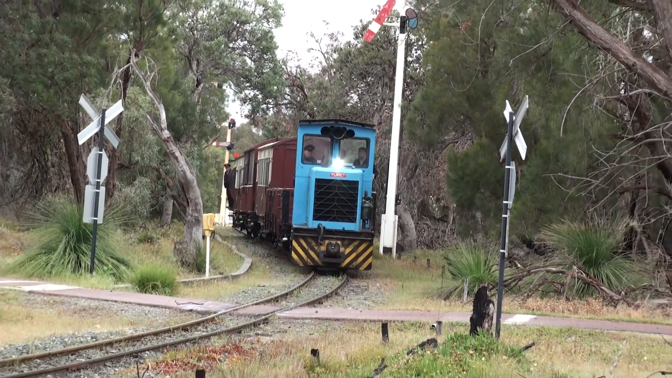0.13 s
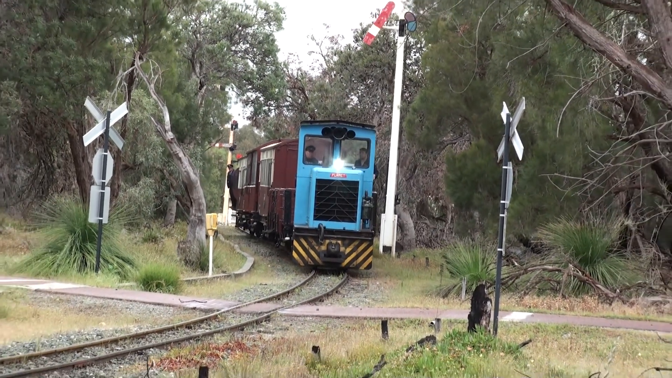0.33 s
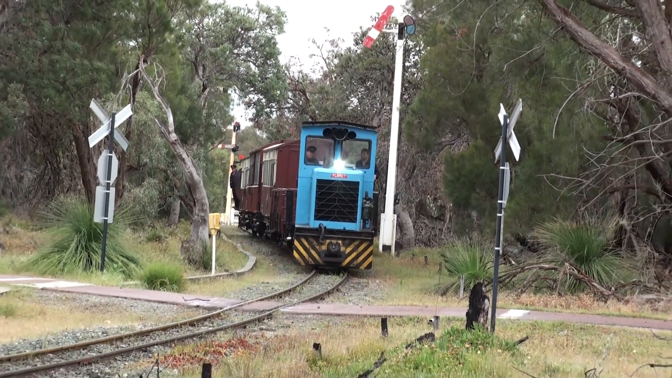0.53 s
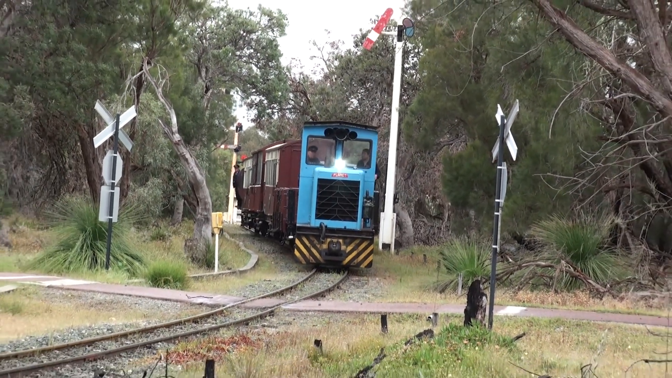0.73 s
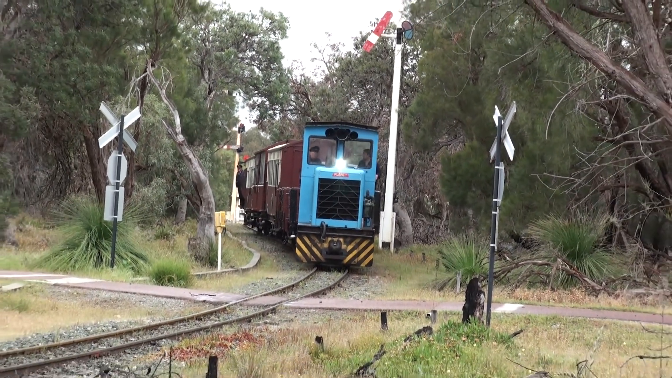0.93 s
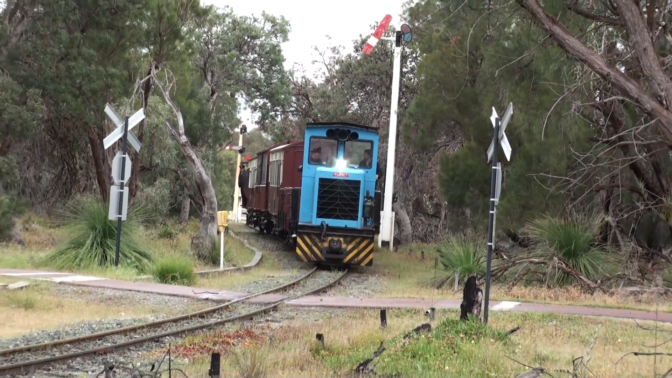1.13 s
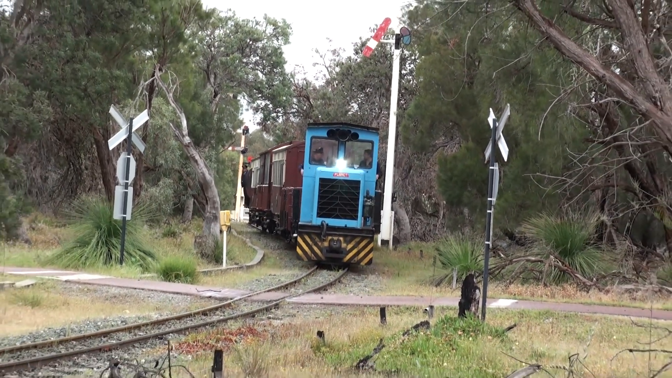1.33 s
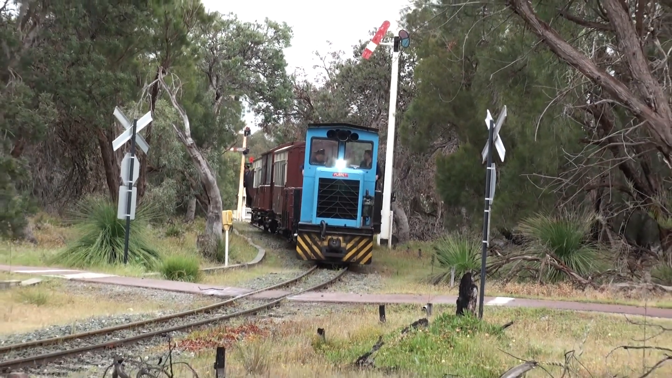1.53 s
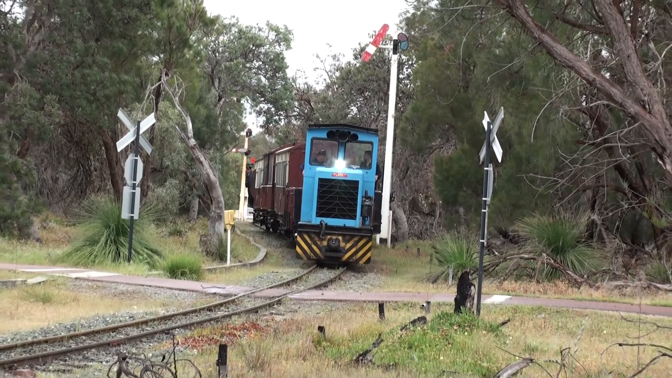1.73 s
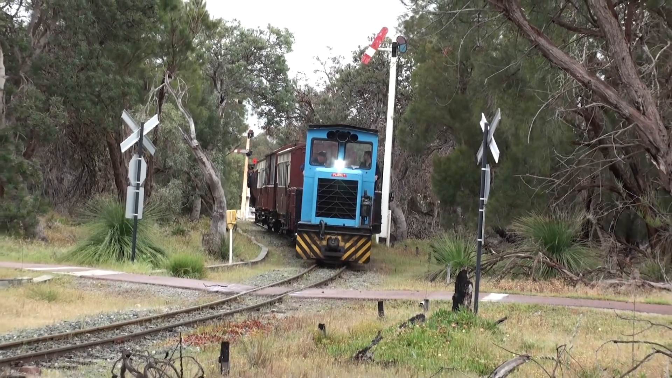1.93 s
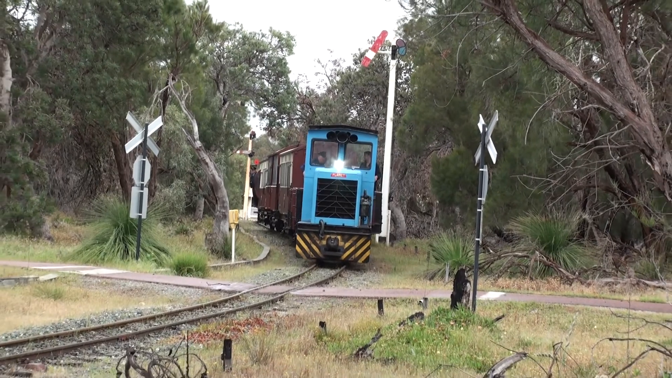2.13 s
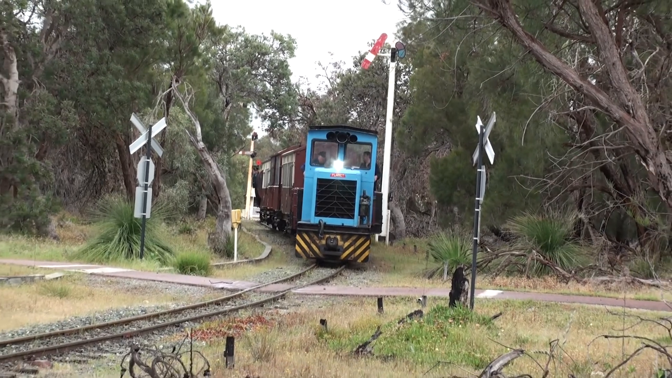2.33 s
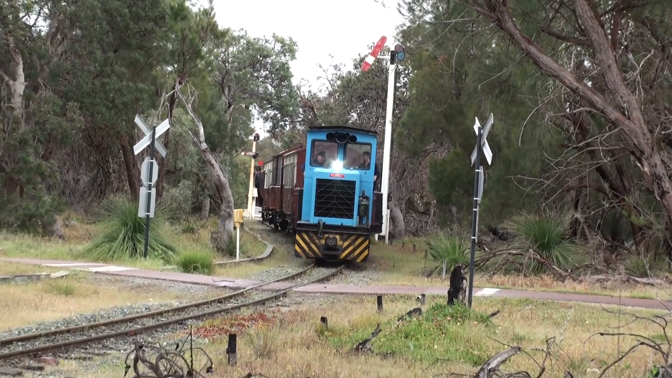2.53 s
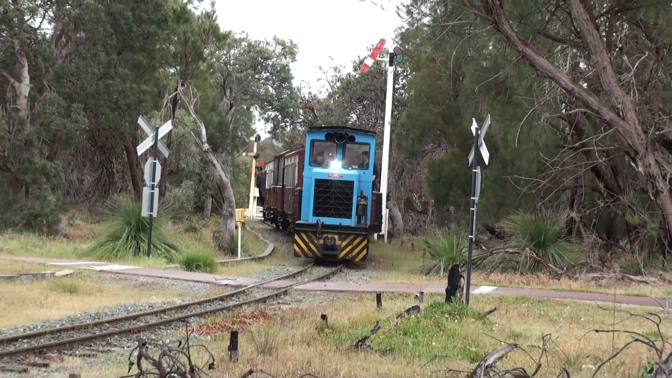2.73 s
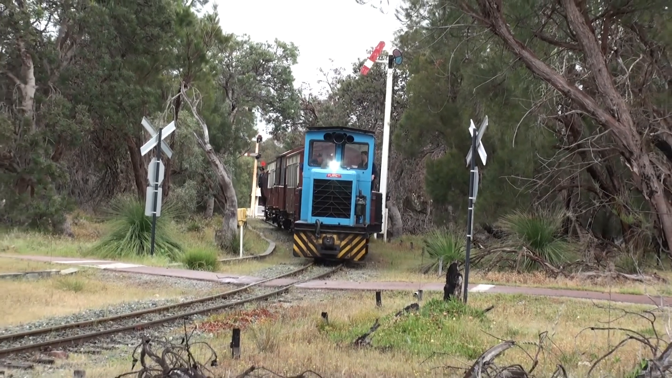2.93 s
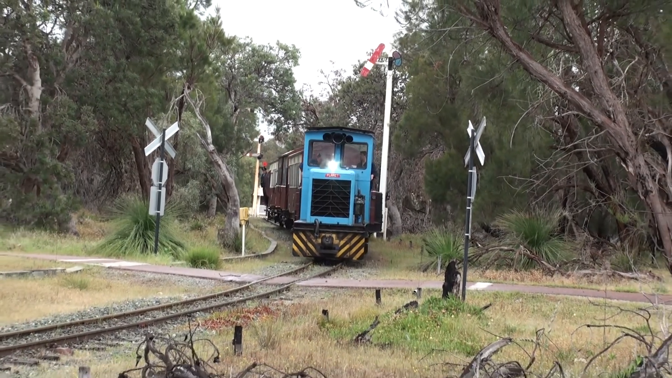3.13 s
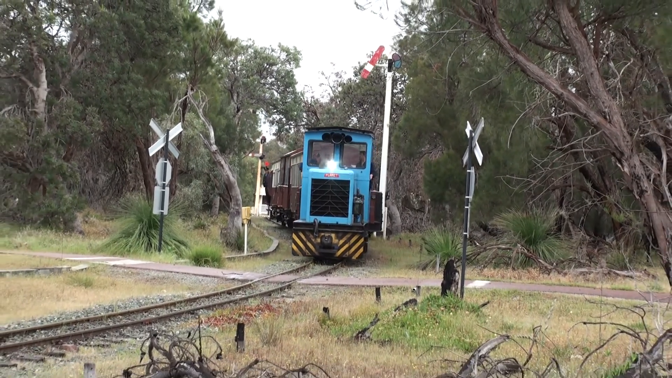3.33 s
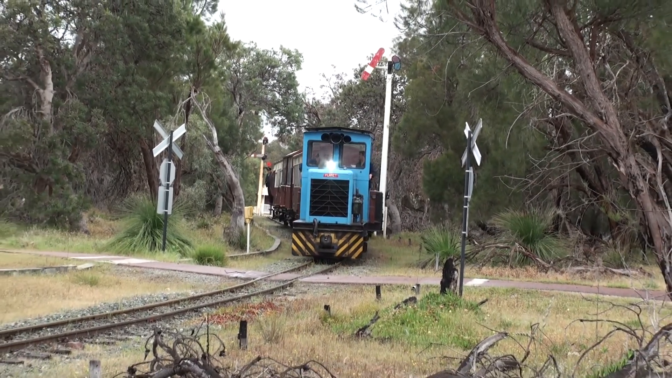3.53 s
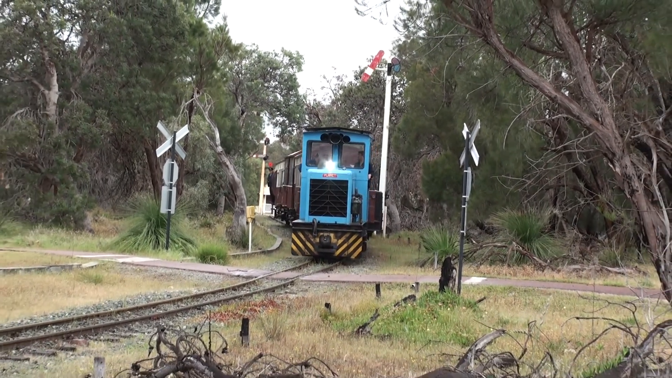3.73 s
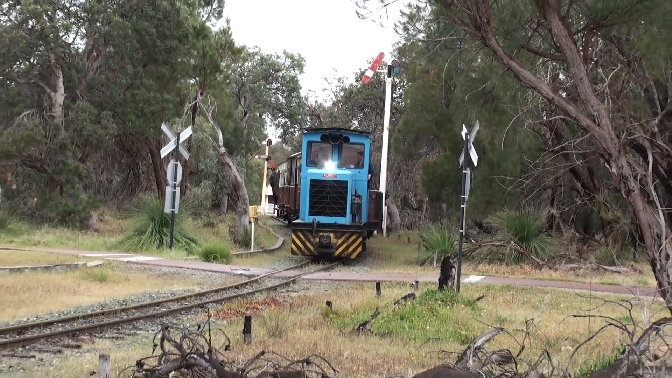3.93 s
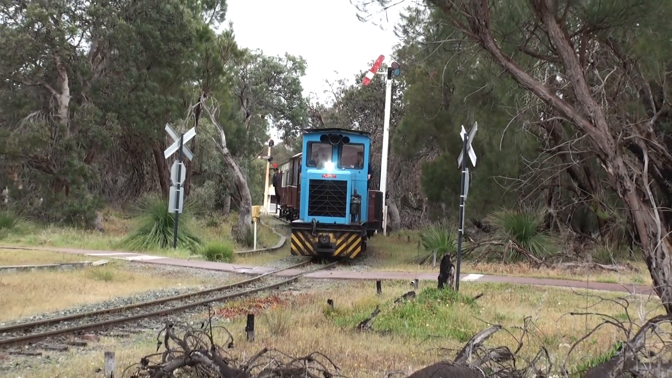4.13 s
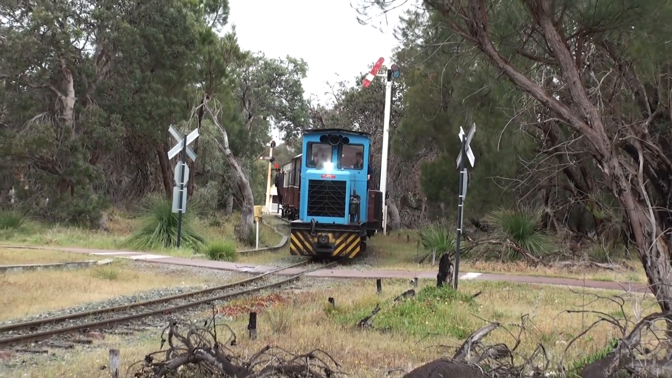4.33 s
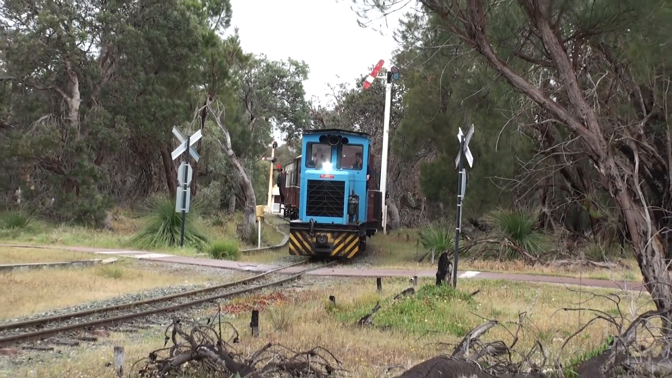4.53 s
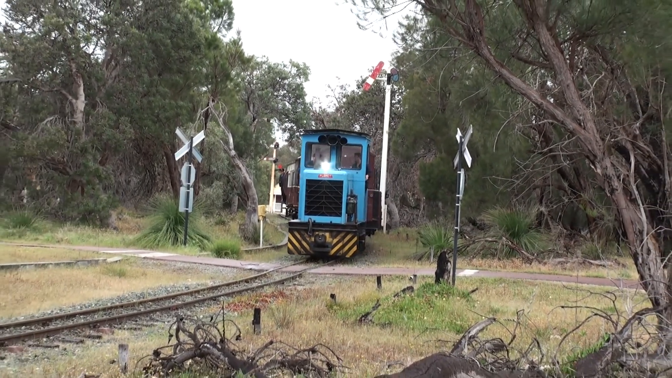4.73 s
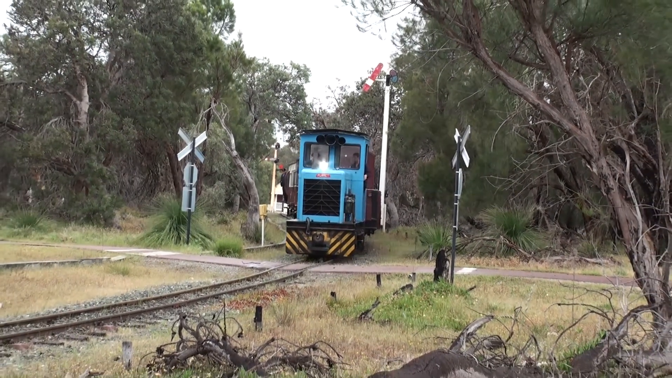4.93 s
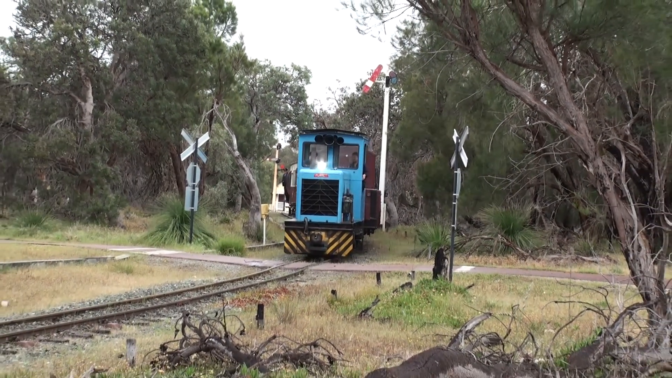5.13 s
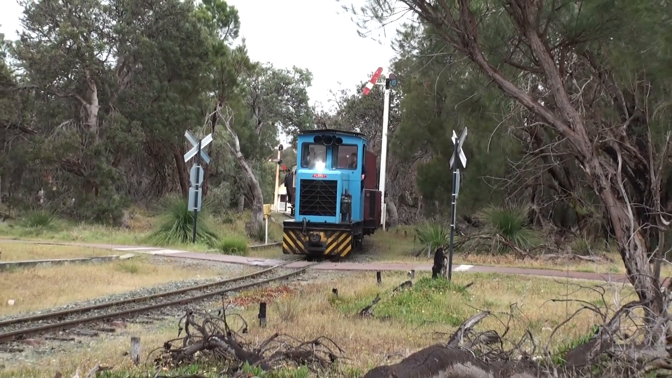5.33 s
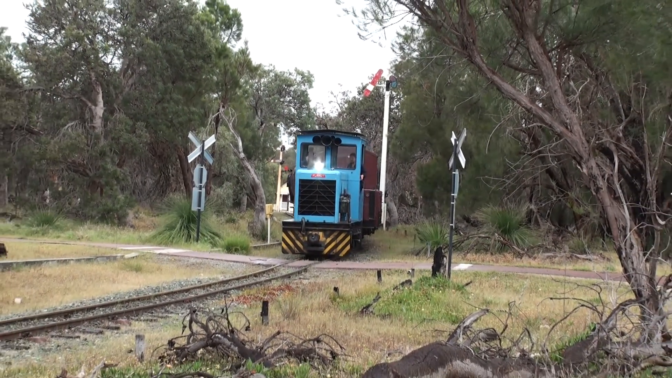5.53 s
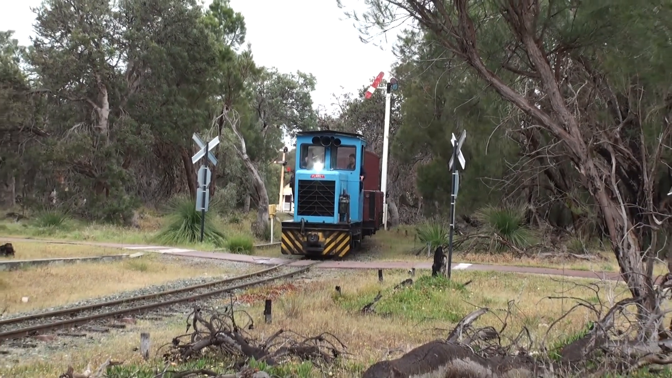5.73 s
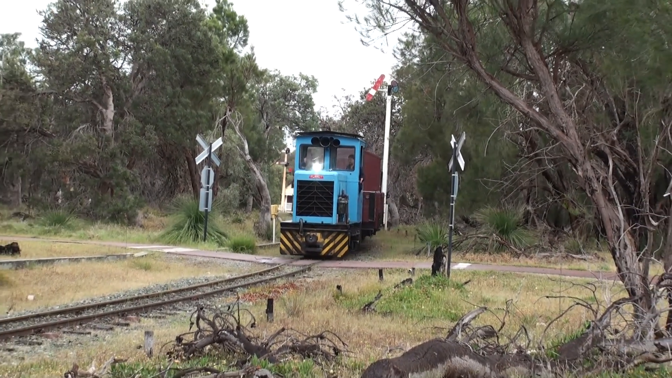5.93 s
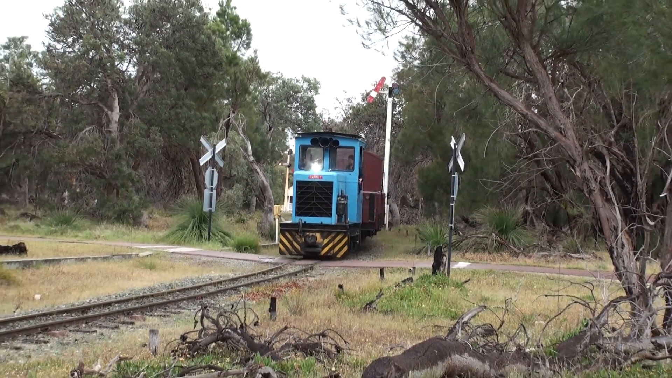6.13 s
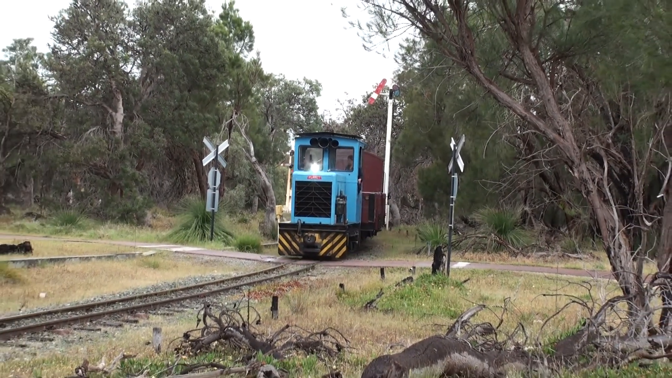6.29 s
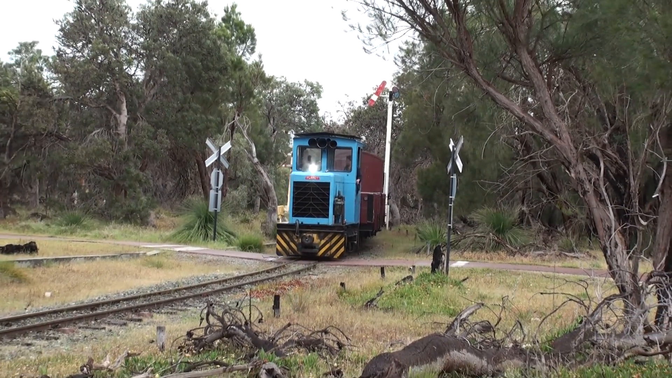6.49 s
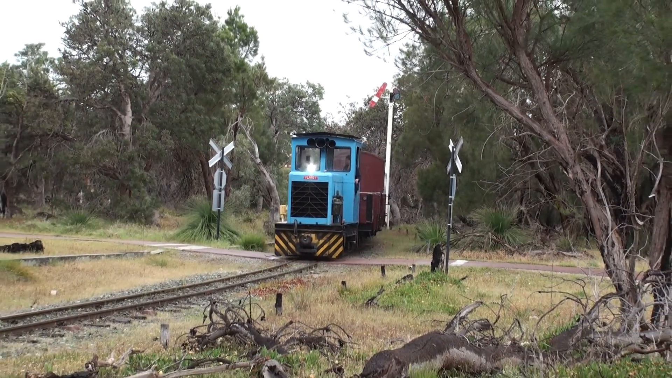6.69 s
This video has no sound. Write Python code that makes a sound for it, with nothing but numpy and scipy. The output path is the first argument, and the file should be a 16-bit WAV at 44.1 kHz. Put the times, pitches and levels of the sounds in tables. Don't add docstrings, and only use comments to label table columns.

```python
import sys
import numpy as np
from scipy import signal
from scipy.fft import rfft, irfft, next_fast_len
from scipy.io import wavfile
from scipy.ndimage import uniform_filter1d

SR = 44100
rng = np.random.default_rng(int(sys.argv[2]) if len(sys.argv) > 2 else 0)


def magnitude_from_level(level_db):
    exponent = np.asarray(level_db, float) / 20
    return 10 ** exponent


def unload_audio(sound):
    columns = np.transpose(np.atleast_2d(sound))
    steps = np.round(np.clip(columns, -1, 1) * 32767)
    wavfile.write(sys.argv[1], SR, steps.astype(np.int16))


N = 298116
EARLY = 3 * SR // 2
T = np.arange(-EARLY, N) / SR
CLATTER_DB = -3.5
SHUT_S = 0.536
HELD_DB = -47.5


def evened(x):
    return x / np.sqrt(np.mean(x ** 2) + 1e-20)


def read(points, hz):
    f, value = np.transpose(points)
    return np.interp(np.log(hz + 1), np.log(f + 1), value)


def shape(x, gain):
    size = next_fast_len(x.shape[-1] + SR // 4)
    spectrum = rfft(x, size) * gain(np.fft.rfftfreq(size, 1 / SR))
    return irfft(spectrum, size)[..., :x.shape[-1]]


def flutter(count, rate, t):
    slow_t = np.arange(T[0], T[-1] + 1, 1 / 200)
    z = rng.standard_normal((count, len(slow_t))) + 1j * rng.standard_normal((count, len(slow_t)))
    r = np.exp(-2 * np.pi * rate / 200)
    for _ in range(2):
        z = signal.lfilter([1 - r], [1, -r], z)
    return [np.interp(t, slow_t, row) for row in z / z.std()]


def panned(pan_db):
    return magnitude_from_level([[pan_db / 2], [-pan_db / 2]])


def add(mix, s, sound):
    part = mix[:, round(s * SR):][:, :sound.shape[1]]
    part += sound[:, :part.shape[1]]


def engine():
    # start_s, twice_firing_rate_hz
    speed_points = [(.5, 99.55), (1.05, 99.6), (1.4, 99.08), (2.6, 99.05), (3.5, 98.78), (3.9, 98.85),
                    (4.2, 99.25), (4.7, 99.35), (5.0, 99.65), (5.7, 99.65), (6.0, 98.9), (6.35, 97.6)]
    idle_hz, load_db_per_hz = 99.14, 1.7
    speed = np.interp(T, *np.transpose(speed_points))
    firings = np.cumsum(speed / 2) / SR + 1.11
    load = magnitude_from_level(load_db_per_hz * np.maximum(idle_hz - speed, 0))
    return exhaust(firings) + clatter(firings, load)


def exhaust(firings, unrest=.05, unrest_slope=.005, silencer=1.2):
    # order of the engine cycle, level_db
    orders = [(4, -31), (6, -8.5), (9, -23), (10, -19), (11, -15.5), (12, 0), (13, -27), (14, -18.5),
              (15, -22), (16, -21), (18, -8), (19, -15), (20, -28), (21, -10.5), (22, -17), (23, -14.5),
              (24, -21), (25, -24), (27, -24), (28, -21.5), (29, -20.5), (30, -23), (32, -27), (34, -19),
              (35, -28), (38, -15), (39, -12), (40, -27), (42, -31)]
    step, out = 8, 0
    drift = flutter(len(orders), 4.5, T[::step])
    for (order, db), z in zip(orders, drift):
        k = round(order)
        lag = 2 * np.arctan(silencer * (12 / k - k / 12))
        lag += 2 * np.pi * rng.random() * (k % 6 > 0)
        tone = np.exp(1j * (2 * np.pi * k / 6 * firings[::step] + lag))
        out = out + magnitude_from_level(db) * (tone * (1 + (unrest + unrest_slope * k) * z)).real
    return evened(signal.resample_poly(out, step, 1)[:len(T)])


def clatter(firings, load, depth=0.28, ring=0.85, swell_db=0.5, treble_db=2):
    # pitch_hz, level_db (per Hz)
    noise_spectrum = [(30, -17), (65, -33), (120, -7.5), (235, -2.5), (330, -7.5), (420, -12.5),
                      (560, -4.5), (800, -4.5), (1120, -6.5), (1400, -7.5), (1800, -12.5), (2800, -19.5),
                      (5040, -24.5), (11000, -34.5), (14400, -44.5), (15500, -56)]
    # pitch_hz, width_hz, level_db
    panel_modes = [(323, 20, 6), (420, 90, -7), (930, 160, 4), (1110, 90, -5), (1350, 300, 4),
                   (1700, 200, -4), (2100, 200, 4), (2370, 120, -4), (2800, 400, 2), (3300, 250, -5),
                   (5500, 300, 2), (6400, 400, 3), (7050, 400, 4), (11800, 350, 7)]
    knocks_db = [-9, -10, -8.5, -12, -5, -10.5]

    def body(hz):
        panels = sum(db / (1 + (2 * (hz - f) / w) ** 2) for f, w, db in panel_modes)
        return magnitude_from_level(read(noise_spectrum, hz) + panels)

    roar = evened(shape(rng.standard_normal(len(T)), body))
    treble = shape(roar, lambda hz: 1 / (1 + (2500 / (hz + 1)) ** 4))
    firing = firings.astype(int)
    knock = magnitude_from_level(knocks_db)[firing % 6] * np.exp(-(firings % 1) / ring)
    knock = uniform_filter1d(knock, size=60)
    knock = knock * magnitude_from_level(3.1 * rng.standard_normal(500))[firing]
    kick = depth * (knock - knock.mean())
    gust = magnitude_from_level(swell_db * flutter(1, 5.9, T)[0].real)
    kicked = treble * magnitude_from_level(treble_db) * gust ** 1.2 * (1 + 2.4 * kick)
    return magnitude_from_level(CLATTER_DB) * ((roar - treble) * load * gust * (1 + kick) + kicked)


def horn(shimmer=0.16, steepen=0.95, jet_db=-24, horn_db=4):
    trumpet_hz = [258.42, 313.88, 374.53, 538.05]
    # harmonic, level_db
    trumpets = [
        [(1, -30.5), (2, -35.5), (3, -31), (4, -30), (5, -28), (6, -33.5), (7, -36), (8, -31), (9, -37),
         (10, -37), (11, -39), (12, -54), (13, -52), (14, -51), (15, -53)],
        [(1, -26.5), (2, -31.5), (3, -25.5), (4, -25), (5, -28), (6, -41), (7, -22), (8, -38), (9, -40.5),
         (10, -44), (11, -38.5), (12, -42.5), (13, -46), (14, -46), (15, -61), (16, -54), (17, -65), (18, -53)],
        [(1, -31), (2, -31), (3, -31.5), (4, -23.5), (5, -25.5), (6, -39), (7, -42.5), (8, -34.5), (9, -38.5),
         (10, -41.5), (11, -52), (12, -64), (13, -61), (14, -64)],
        [(1, -25.5), (2, -34.5), (3, -35), (4, -29.5), (5, -54), (6, -51), (7, -49), (8, -46), (9, -61)],
    ]
    # pitch_hz, level_db
    sum_colour = [(200, -12), (500, -3), (900, -0.5), (1500, 12), (2100, 6), (2500, -8), (4000, -5),
                  (8000, -15)]
    # pitch_hz, level_db (per Hz)
    jet_spectrum = [(40, -33), (180, -15.5), (308, -10), (454, -12.5), (536, -10), (682, -18), (748, -3),
                    (1690, -14), (2150, -4), (10200, -30), (15000, -46)]
    fall_db_per_s, leak_db, leak_db_per_s = 420, -19.5, 93
    puff_db, puff_hz, puff_width_hz, puff_s = -26, 2670, 560, 0.0093
    t = T[:EARLY + SR]
    chord = 0
    for f0, partials in zip(trumpet_hz, trumpets):
        for (k, db), z in zip(partials, flutter(len(partials), 9.0, t)):
            tone = np.exp(2j * np.pi * (round(k) * f0 * t + rng.random()))
            chord = chord + magnitude_from_level(db) * (tone * (1 + shimmer * z)).real
    sums = shape(chord ** 2, lambda hz: magnitude_from_level(read(sum_colour, hz)) / (1 + (200 / (hz + 1)) ** 8))
    chord = chord + steepen * sums
    jet = evened(shape(rng.standard_normal(len(t)), lambda hz: magnitude_from_level(read(jet_spectrum, hz))))
    shut = np.maximum(t - SHUT_S, 0)
    air = np.maximum(magnitude_from_level(-fall_db_per_s * shut), magnitude_from_level(leak_db - leak_db_per_s * shut))
    puff = evened(shape(jet, lambda hz: 1 / (1 + (2 * (hz - puff_hz) / puff_width_hz) ** 4)))
    puff = magnitude_from_level(puff_db) * puff * np.exp(-((t - SHUT_S + puff_s) / puff_s) ** 2)
    sound = (chord * magnitude_from_level(horn_db) + jet * magnitude_from_level(jet_db)) * air + puff
    return np.pad(sound / magnitude_from_level(HELD_DB), (0, len(T) - len(t)))


def ports(x):
    # pitch_hz, left_leads_rad
    lead = [(50, -.6), (100, -.5), (170, -.95), (400, -1.05), (1890, -.12), (6000, 0), (7900, .8),
            (9000, 0)]
    # pitch_hz, left_right_db
    tilt = [(50, 1), (100, -1.7), (200, -.3), (550, -.7), (1650, -2.2), (5000, -1.4), (15000, 0)]
    side = np.array([[.5], [-.5]])
    both = np.array([x, x])
    return shape(both, lambda hz: magnitude_from_level(side * read(tilt, hz)) * np.exp(1j * side * read(lead, hz)))[:, EARLY:]


def tail(level, t60, start_s):
    taps = np.zeros((2, 2 * SR))
    at = np.arange(0, 2 * SR - 40, 20) + rng.integers(0, 20, (2, (2 * SR - 21) // 20))
    np.put_along_axis(taps, at, rng.choice([-1., 1.], at.shape), 1)
    hz, t, z = signal.stft(taps, SR, nperseg=256)
    fall = magnitude_from_level(-60 * t / t60(hz)[:, None])
    z = z * fall / np.sqrt((fall ** 2).sum(1, keepdims=True) * 128 / 20)
    reflections = shape(signal.istft(z, SR, nperseg=256)[1], lambda hz: magnitude_from_level(read(level, hz)))
    return np.pad(reflections, ((0, 0), (int(start_s * SR), 0)))


def echoes(x, near_t60=0.26, leaves=.8):
    # pitch_hz, level_db
    near_spectrum = [(60, -34), (150, -76), (300, -11), (700, -9), (1500, -10.5), (3500, -10.5), (8000, -7),
                     (15000, -24)]
    # pitch_hz, level_db
    far_spectrum = [(100, -87), (250, -18), (400, -22), (650, -10), (1000, -17), (2500, -21), (8000, -25)]
    # pitch_hz, t60_s
    far_t60 = [(100, 0.83), (400, 0.98), (1000, 1.7), (3000, 1.6), (10000, 0.17)]
    trees = tail(near_spectrum, lambda hz: near_t60 + 0 * hz, 0.0024)[:, :2 * SR]
    trees = trees + tail(far_spectrum, lambda hz: read(far_t60, hz), 0.028)[:, :2 * SR]
    wet = signal.fftconvolve(x[None, :EARLY + SR], trees, axes=1)[:, EARLY:]
    z = signal.stft(wet, nperseg=1024, noverlap=768)[2]
    a, b = uniform_filter1d(uniform_filter1d(rng.standard_normal((2, *z.shape)), size=5), size=3, axis=2)
    stir = (a + 1j * b) / np.hypot(a.std(), b.std())
    wet = signal.istft(z * (1 - leaves + leaves * stir), nperseg=1024, noverlap=768)[1]
    return np.pad(wet, ((0, 0), (0, N)))[:, :N] + walls(x)


def walls(x, thin_db=-6):
    # delay_s, level_db, pitch_hz, width_hz, left_right_db
    tree_lines = [(0.054, -9, 294, 110, -2), (.2, -18, 770, 500, 12), (.5, -21, 630, 60, 5),
                  (.62, -29, 535, 60, 3), (0.521, -24, 1080, 200, 6), (.65, -21, 369, 69.6, 2),
                  (1.3, -35, 374, 70, 0)]
    out = np.zeros((2, N))
    for delay, db, hz, width, pan_db in tree_lines:
        dull = shape(x, lambda f: magnitude_from_level(db) / (1 + (2 * (f - hz) / width) ** 4))
        thin = magnitude_from_level(thin_db * np.clip(2 * (T[EARLY:] - SHUT_S) / delay - 1, 0, 1) ** 2)
        out += dull[EARLY - round(delay * SR):][:N] * thin * panned(pan_db)
    return out


def squeaks(scratchy=0.57):
    # start_s, level_db, pitch_hz, length_s
    whistles = [(2.046, -55, 10700, 0.025), (3.648, -50, 10900, 0.024), (4.6, -50, 9900, 0.024),
                (4.645, -50, 9900, 0.018), (4.757, -48, 10300, .04), (5.168, -46, 10490, 0.018),
                (5.45, -46, 10150, 0.081), (6.227, -41, 10200, 0.051)]
    out = np.zeros((2, N))
    for s, db, hz, length in whistles:
        u = np.arange(0, length, 1 / SR)
        scratch = 1 + scratchy * evened(uniform_filter1d(rng.standard_normal(9000), 60))[:len(u)]
        whistle = np.sin(2 * np.pi * hz * u * (1 - 0.17 * u))
        swell = np.minimum(u / 0.0036, 1) * np.cos(np.pi / 2 * u / u[-1]) ** 2
        squeak = scratch * whistle * swell
        add(out, s, magnitude_from_level(db) * np.array([squeak, squeak]))
    return out


def twigs(colour=.7, apart=0.4):
    # start_s, peak_db, left_right_db
    ticks = [(1.268, -26.5, -2), (1.6013, -31, -2.0), (2.282, -31, -2.0), (2.748, -26, 1),
             (2.8838, -29.5, -1.5), (3.9714, -31, 1.5), (4.027, -15.5, -7), (4.8185, -19, -1),
             (5.9296, -21, -1.0), (6.6376, -20, 0.0)]
    # start_s, peak_db, left_right_db, ring_hz, length_s
    snap = (5.9941, -11.5, 2, 8200, 0.0011)
    tick_hz, tick_s = 4300, .0003
    out, t = np.zeros((2, N)), np.arange(600) / SR
    for s, db, pan_db, hz, length in [(*row, tick_hz, tick_s) for row in ticks] + [snap]:
        a, b = rng.standard_normal((2, 600))
        a[2:4] = 2.5, -2.0
        crack = np.array([a + apart * b, a - apart * b]) * np.exp(-(t / length / 2) ** 2)
        crack = shape(crack, lambda f: 1 / (1 + (f / 12000) ** 6) / (1 + (hz / 2 / (f + 1)) ** 4))
        ring = colour * np.sin(2 * np.pi * hz * t) * np.exp(-t / length)
        add(out, s, magnitude_from_level(db - 4.5) * (crack + ring) * panned(pan_db))
    return out


def surround(level_db=-11.5):
    # pitch_hz, level_db (per Hz)
    rumble_spectrum = [(40, -26), (80, -20), (150, -7), (300, -3), (420, -8), (800, -5), (1400, -9),
                       (3000, -24), (5500, -29.5), (8000, -27), (10500, -33), (15000, -65)]
    rumble = shape(rng.standard_normal((2, N)), lambda hz: magnitude_from_level(read(rumble_spectrum, hz)))
    return magnitude_from_level(level_db + CLATTER_DB) * evened(rumble)


def auto_gain_db():
    let_go_s, jump_db, jump_s = 0.51, 5.8, 0.11
    creep_db_per_s, full_s, ease_db, ease_s = 4.2, 5.82, -1.4, 0.35
    t = T[EARLY:]
    jump = jump_db * np.clip((t - let_go_s) / jump_s, 0, 1)
    creep = creep_db_per_s * (np.clip(t, let_go_s, full_s) - let_go_s)
    ease = ease_db * np.clip((t - full_s) / ease_s, 0, 1)
    return HELD_DB + jump + creep + ease


def scene():
    blast = horn()
    small = (twigs() + squeaks()) / magnitude_from_level(auto_gain_db())
    return ports(engine() + blast) + echoes(blast) + surround() + small


def band_limit(x):
    return signal.sosfilt(signal.butter(12, 16200, fs=SR, output="sos"), x)


def record(dry):
    x = shape(dry * magnitude_from_level(auto_gain_db()), lambda hz: 1 / (1 + (hz / 16000) ** 16))
    return band_limit(np.clip(x, -1, 1))


dry = scene()
out = record(dry)
unload_audio(out)
```